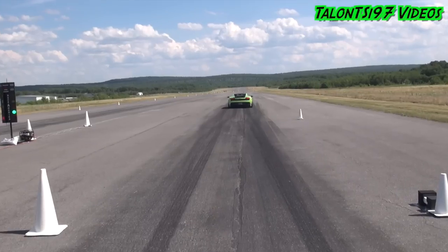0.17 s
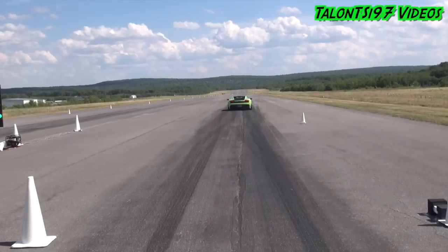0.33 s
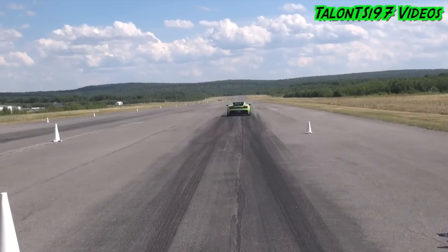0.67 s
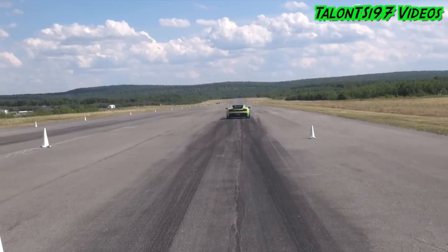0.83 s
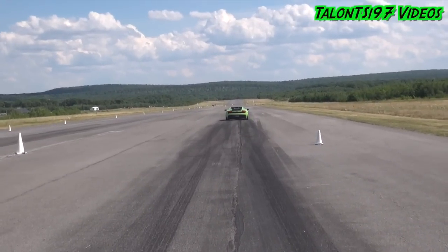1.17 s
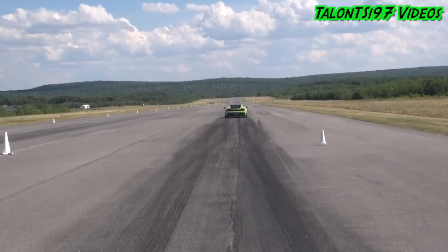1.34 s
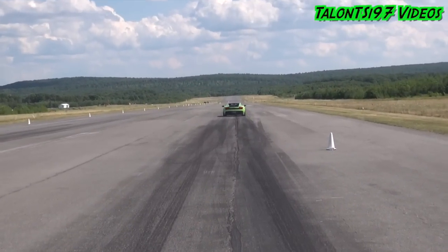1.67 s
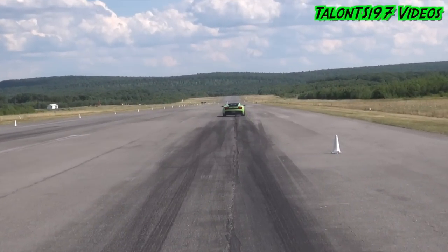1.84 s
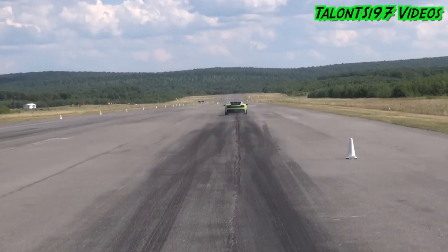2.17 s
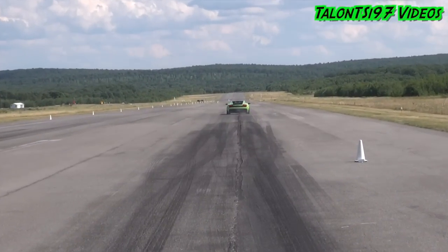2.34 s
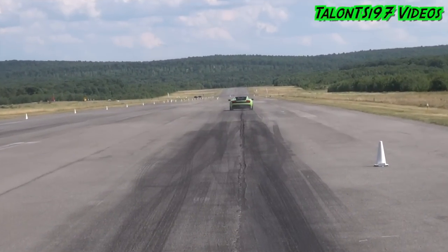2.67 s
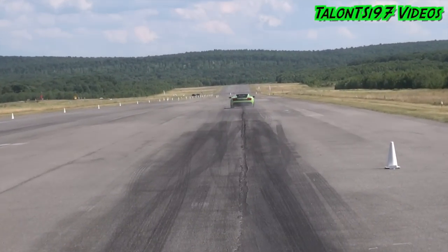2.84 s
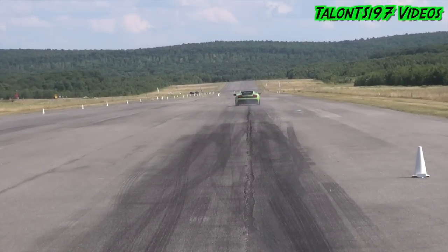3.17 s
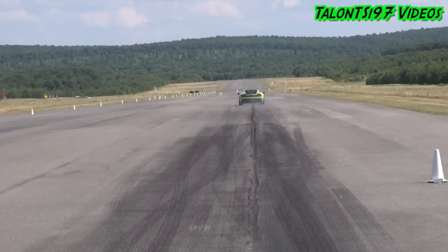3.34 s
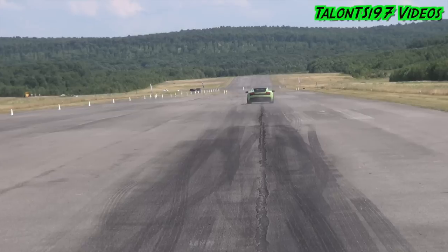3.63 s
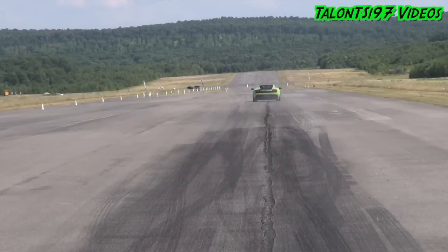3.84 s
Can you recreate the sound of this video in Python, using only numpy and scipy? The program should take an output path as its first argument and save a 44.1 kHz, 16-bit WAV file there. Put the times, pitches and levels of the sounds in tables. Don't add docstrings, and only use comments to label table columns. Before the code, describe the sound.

A powerful car launches already loud, its even, raspy exhaust howl climbing steadily until about 2.05 s, with faint gear whine. The throttle shuts, revs fall, and a sharp bang cracks at 2.3 s. Small crackles follow around 2.5 s as power returns high and flaring, cut near 3 s with a double bang at 3.1 s. A lower, quieter pull rises to the end. Faint generator hiss and knocking, light wind.

```python
import sys
import numpy as np
from scipy import signal
from scipy.fft import rfft, irfft, next_fast_len
from scipy.io import wavfile
from scipy.ndimage import uniform_filter1d, minimum_filter1d, map_coordinates

SR = 44100
rng = np.random.default_rng(int(sys.argv[2]) if len(sys.argv) > 2 else 0)


def nominal_scale(level):
    x = np.asarray(level, float) / 20
    return 10 ** x


def generate_wav(sig):
    pcm = np.round(np.clip(np.atleast_2d(sig).T, -1, 1) * 32767).astype(np.int16)
    wavfile.write(sys.argv[1], SR, pcm)


N = 176400
TIME_S = np.arange(N) / SR


def unit(x):
    return x / np.sqrt(np.mean(x ** 2) + 1e-20)


def along(points, hz):
    f, v = np.transpose(points)
    return np.interp(np.log(hz + 1), np.log(f + 1), v)


def curves(rows):
    s, *columns = np.transpose(rows)
    return [np.interp(TIME_S, s, column) for column in columns]


def wobble(rate):
    return map_coordinates(rng.standard_normal(1000), [TIME_S * rate])


def filtered(x, response):
    m = next_fast_len(N + SR // 2)
    return irfft(rfft(x, m) * response(np.fft.rfftfreq(m, 1 / SR)), m)[:N]


def resonances(peaks, flip=True):
    def response(f):
        total = 0
        for k, (centre, width, db) in enumerate(peaks):
            sign = (-1) ** (k * flip)
            total = total + sign * nominal_scale(db) * 1j * f * width / (centre ** 2 - f * f + 1j * f * width)
        return total
    return response


def noise(spectrum):
    return unit(filtered(rng.standard_normal(N), lambda hz: nominal_scale(along(spectrum, hz))))


def order(k, turn, db, loose, start):
    flutter_db, drift_rad = 1.3, 0.18
    level = np.sqrt(2) * nominal_scale(db + loose * flutter_db * wobble(25))
    return level * np.cos(k * turn + loose * drift_rad * wobble(14) + start)


# (frequency [Hz], phase [rad])
PIPE_PHASE = [(320, -1.3), (370, -2), (405, -1.6), (435, -.3), (570, -.7), (620, 1.2)]
# (frequency [Hz], level [dB])
TWENTIETH_ORDER = [(620, -13.5), (680, -29.5), (850, -36.5), (950, -31.5), (1050, -25.5), (1130, -43.5)]
# (multiple of the cycle [1], level [dB])
FIRING_OVERTONES = [(15, -8.5), (25, -37), (30, -44.5)]
# (frequency [Hz], level [dB])
GROUND_COLOUR = [(450, -6), (600, 0.5), (680, -12), (850, -4.5), (1000, -0.5), (1300, -12)]


def firing_note(turn, hz, bank_db, full_db):
    steady = 0.4
    note = order(5, turn, bank_db, steady, 0)
    note += order(10, turn, full_db, steady, along(PIPE_PHASE, 10 * hz))
    note += order(20, turn, bank_db + along(TWENTIETH_ORDER, 20 * hz), 1, 0)
    for k, db in FIRING_OVERTONES:
        note += order(k, turn, full_db + db + along(GROUND_COLOUR, k * hz), steady, 1.6)
    return note


# (multiple of the cycle [1], level [dB])
UNEVEN_ORDERS = [(6, 0.5), (7, 0), (8, 1.5), (9, -1.5), (11, -13.5), (12, -12), (13, -6.5), (14, -13.5),
                 (16, -3), (17, -8), (18, -4.5), (21, 0.5), (22, -1), (23, -4.5), (26, 2), (27, 4)]
# (frequency [Hz], level [dB])
PIPE_COLOUR = [(170, -9.5), (235, -12.5), (290, -9), (345, -1), (400, -21), (530, -10), (650, -30),
               (1000, -44)]
# (time [s], level [dB])
UPPER_FADE = [(0, 3.5), (.6, 2), (1.1, 4), (1.6, 1.5), (2, -3), (2.7, -5.5), (3.3, -9), (4, -5.5)]
# (time [s], level [dB])
SEVENTH_SWELL = [(0, 0), (1.5, -1.5), (1.75, 7.5), (2.04, 12.5), (2.1, -12), (2.4, 3), (2.7, -0.5),
                 (3.3, 3), (4, -2)]
# (multiple of the cycle [1], level [dB])
LOW_ENGINE_ORDERS = [(2, -9), (3, -12.5), (4, -28)]
# (frequency [Hz], level [dB])
BASS_COLOUR = [(60, -31.5), (100, -23.5), (130, -7), (170, -1.5), (250, 6.5)]


def uneven_growl(turn, hz, bank_db, uneven_db):
    (upper_db,), (seventh_db,) = curves(UPPER_FADE), curves(SEVENTH_SWELL)
    growl = np.zeros(N)
    for k, db in UNEVEN_ORDERS:
        swell_db = (k > 7) * upper_db + (k == 7) * seventh_db
        level_db = uneven_db + swell_db + db + along(PIPE_COLOUR, k * hz)
        growl += order(k, turn, level_db, 0.46, rng.uniform(0, 2 * np.pi))
    for k, db in LOW_ENGINE_ORDERS:
        level_db = bank_db + db + along(BASS_COLOUR, k * hz)
        growl += order(k, turn, level_db, 0.64, rng.uniform(0, 2 * np.pi))
    return growl


# (frequency [Hz], level [dB per Hz])
ROAR_SPECTRUM = [(60, -55.5), (120, -18), (200, -12), (330, 3), (500, -4), (700, -18), (1100, -14),
                 (3000, -65)]


def roar(turn):
    stumble_s, width_s, stumble_db = 3.6, 0.03, 9
    ragged_db = stumble_db * np.exp(-((TIME_S - stumble_s) / width_s) ** 2)
    puffs = 1 + 0.6 * np.cos(5 * turn)
    return nominal_scale(-23.5 + ragged_db + wobble(26)) * puffs * noise(ROAR_SPECTRUM)


# (multiple of the cycle [1], level [dB])
GEAR_MESH = [(60, -38), (90, -42)]
# (frequency [Hz], width [Hz], level [dB])
GEARBOX_RINGS = [(2890, 130, 0), (4230, 150, 0)]


def gear_whine(turn, hz):
    whine = np.zeros(N)
    for k, db in GEAR_MESH:
        whine += abs(resonances(GEARBOX_RINGS)(k * hz)) ** 2 * order(k, turn, db, 2, 0)
    first_shift_s = 2.06
    return whine * (np.arange(N) < first_shift_s * SR)


# (time [s], engine cycles [Hz], bank firing [dB], imbalance [dB], full firing [dB])
FIRST_PULL = [
    (0, 31.02, -15.5, -18, -5.5),
    (.32, 33.97, -19, -25, -7),
    (.55, 36.52, -16, -20.5, -11.5),
    (.8, 39.16, -16.5, -20, -18),
    (1.01, 41.88, -17, -21.5, -22.5),
    (1.31, 46, -16.5, -17, -20.5),
    (1.68, 51.86, -15.5, -17.5, -23),
    (2.0, 58.48, -12.5, -23, -22),
    (2.052, 60.66, -10.5, -18.5, -30),
]
FIRST_LIFT = [
    (2.073, 56.4, -34, -23.5, -50),
    (2.111, 51.32, -29.5, -23.5, -66),
    (2.291, 45.56, -30, -27, -35),
    (2.311, 44.82, -40, -32.5, -60),
    (2.453, 41.01, -46, -43, -41.5),
]
SECOND_PULL = [
    (2.458, 38.74, -20.5, -42, -26.5),
    (2.491, 51.33, -26.5, -20, -44),
    (2.515, 57.26, -26.5, -27.5, -30.5),
    (2.551, 61.63, -21.5, -25, -42),
    (2.644, 63.55, -23.5, -23.5, -35.5),
    (2.749, 61.7, -20.5, -25.5, -36.5),
    (2.842, 60.1, -19, -26, -32.5),
    (2.973, 63.38, -17.5, -27, -42),
]
SECOND_LIFT = [
    (2.996, 60.26, -31.5, -46.5, -60),
    (3.052, 55.36, -29.5, -36, -54),
    (3.074, 54.22, -56, -28, -48),
    (3.132, 44.65, -31.5, -34, -44),
]
THIRD_PULL = [
    (3.17, 44.61, -35, -32.5, -50),
    (3.213, 46.36, -31.5, -30, -52),
    (3.293, 46.14, -33, -30, -49),
    (3.45, 46.6, -33, -29, -41.5),
    (3.8, 50.5, -26.5, -27, -35),
    (4.0, 52.08, -23, -23, -42.5),
]


def exhaust():
    rows = [*FIRST_PULL, *FIRST_LIFT, *SECOND_PULL, *SECOND_LIFT, *THIRD_PULL]
    hz, bank_db, uneven_db, full_db = curves(rows)
    turn = 2 * np.pi * np.cumsum(hz) / SR - 0.27
    note = firing_note(turn, hz, bank_db, full_db) + uneven_growl(turn, hz, bank_db, uneven_db)
    effort = np.sqrt(nominal_scale(bank_db) ** 2 + nominal_scale(full_db) ** 2 + nominal_scale(uneven_db) ** 2)
    return note + effort * (gear_whine(turn, hz) + roar(turn))


# (time [s], level [dB], sharpness [1])
BACKFIRES = [
    (2.3263, 1, 0.87),
    (3.0830, 1, 0.81),
    (3.0900, -5.5, 1),
    (2.4578, -19.5, 0.3),
    (2.464, -13.5, 0.48),
    (2.479, -16.5, 0.23),
    (2.502, -18, .3),
    (2.518, -14.5, 0.48),
]
# (frequency [Hz], width [Hz], level [dB])
TAILPIPE_RINGS = [(175.4, 61, 12.5), (265.9, 44, 6), (440, 77, -26), (550, 42, -22), (1050, 240, -5)]


def backfires():
    blast, crack, snap = np.zeros(N), np.zeros(N), np.zeros(N)
    t = np.arange(SR // 5) / SR
    u = t / 0.00045
    push = np.where(u < 2, u / 2, -0.5 * np.exp(1 - u / 2))
    crack_decay = nominal_scale(-19 - 60 * t / 0.07)
    ground_scatter = nominal_scale(-26.5 - 60 * t / 0.094)
    grit = (crack_decay + ground_scatter) * np.minimum(u / 2, 1)
    snap_s, snap_t60 = 0.0026, 0.0053
    edges = nominal_scale(-60 * t / snap_t60) + nominal_scale(-60 * abs(t - snap_s) / snap_t60) * (t > snap_s)
    for s, db, sharp in BACKFIRES:
        here = slice(round(s * SR), round(s * SR) + len(t))
        blast[here] += nominal_scale(db + 3) * push
        crack[here] += nominal_scale(db) * sharp * grit * rng.standard_normal(len(t))
        snap[here] += nominal_scale(db - 44) * sharp ** 4 * edges * rng.standard_normal(len(t))

    def pipe(f):
        thump_cut_hz, soften_hz = 110, 1700
        band = 1j * f / (thump_cut_hz + 1j * f) / (1 + 1j * f / soften_hz)
        return resonances(TAILPIPE_RINGS, flip=False)(f) * band ** 2

    def air(f):
        return resonances([(900, 1500, 0), (3000, 3500, -6)], flip=False)(f) / (1 + 1j * f / 4600) ** 3

    return snap + filtered(blast, pipe) + filtered(crack, air)


# (frequency [Hz], level [dB per Hz])
HISS_SPECTRUM = [(500, -6.5), (1100, -5), (1700, -10.5), (2400, -11), (4000, -21), (6000, -30),
                 (9000, -38.5), (15500, -58)]
# (frequency [Hz], width [Hz], level [dB], share of the cycle [1])
CASING_KNOCKS = [(1138, 56, -9, 0.45), (1307, 210, -9.5, .9), (1766, 74, -16, .22), (2070, 23, -13.5, .22),
                 (2072, 210, -19, 0.75), (2261, 110, -9, 0.26), (2334, 180, -20.5, 0.64),
                 (2641, 72, -13, .57), (2876, 100, -16.5, 0.26), (3370, 340, -19.5, 0.44),
                 (3965, 300, -19.5, .03), (5530, 300, -32, 0.046), (6520, 250, -31, 0.28),
                 (7250, 700, -28, 0.23), (8030, 300, -34.5, .5)]


def generator(gain_db):
    cycle_hz, knock_t60, repeat = 30.67, 0.035, 0.65
    cycle = cycle_hz * np.arange(N) / SR
    gate_db = 0.5 * np.cos(2 * np.pi * (cycle - 0.35))
    hiss = unit(nominal_scale(gate_db + 0.5 * wobble(8.8)) * noise(HISS_SPECTRUM))
    clatter = np.zeros(N)
    for hz, width, db, share in CASING_KNOCKS:
        since_s = (cycle - share) % 1 / cycle_hz
        same_each_time = rng.standard_normal(SR)[(since_s * SR).astype(int)]
        burst = repeat * same_each_time + (1 - repeat) * rng.standard_normal(N)
        knock = nominal_scale(wobble(30) - 60 * since_s / knock_t60) * burst
        clatter += nominal_scale(db) * unit(filtered(knock, lambda f: resonances([(hz, width, 0)])(f) ** 2))
    both = hiss + nominal_scale(-1.5) * clatter
    treble = filtered(both, lambda f: 1 / (1 + (4470 / (f + 1)) ** 4))
    swell = nominal_scale(0.7 * (gain_db - gain_db.max()))
    return nominal_scale(3.5 + gain_db) * (both - treble + swell * treble)


# (frequency [Hz], level [dB per Hz])
WIND_SPECTRUM = [(20, -14), (40, -0.5), (80, 8), (130, 12.5), (250, 4.5), (500, -8.5), (1000, -41)]


def wind():
    gust_db = 2.5
    return nominal_scale(-41 + gust_db * wobble(10)) * noise(WIND_SPECTRUM)


# (time [s], level [dB])
RECORDER_GAIN = [(0, -41), (.05, -46.5), (.49, -48.5), (.58, -45.5), (1, -43), (1.5, -39), (1.8, -39.5),
                 (2.0, -39), (2.295, -38.5), (2.31, -46.5), (2.36, -52.5), (2.45, -46.5), (2.95, -41.5),
                 (3.07, -42), (3.14, -48), (3.22, -45.5), (3.66, -45.5), (3.72, -42.5), (4, -44)]


def scene():
    gain_db, = curves(RECORDER_GAIN)
    breathing = nominal_scale(0.5 * (gain_db - gain_db.mean()))
    background = generator(gain_db) + breathing * wind()
    return (exhaust() + backfires() + background)[None]


def top_cut(x):
    return signal.sosfilt(signal.butter(12, 15805, fs=SR, output="sos"), x)


def record(dry):
    ceiling, hold = 1.012, round(0.012 * SR)
    needed = np.minimum(1, ceiling / (abs(dry) + 1e-9))
    gain = uniform_filter1d(minimum_filter1d(needed, size=2 * hold), size=hold)
    return top_cut(np.clip(gain * dry, -1, 1))


dry = scene()
out = record(dry)
generate_wav(out)
```